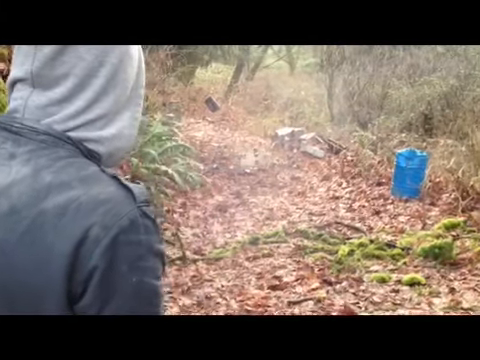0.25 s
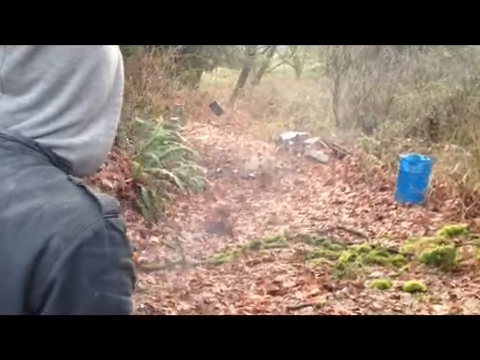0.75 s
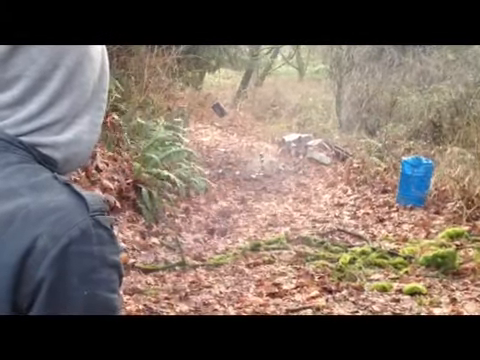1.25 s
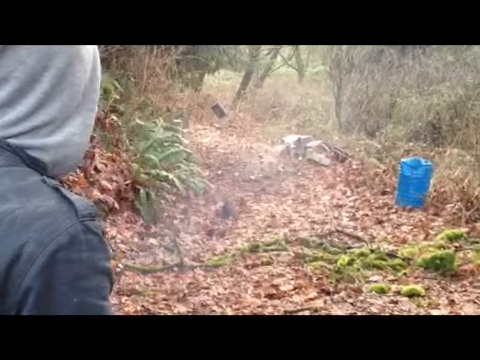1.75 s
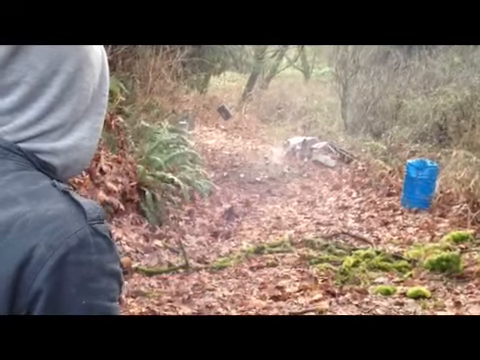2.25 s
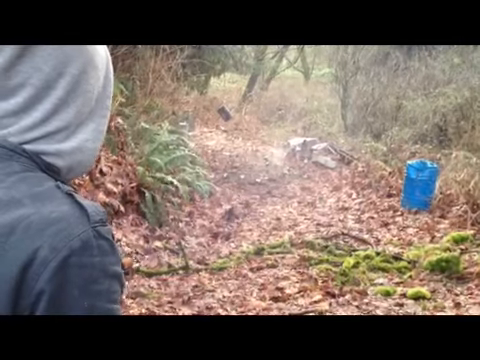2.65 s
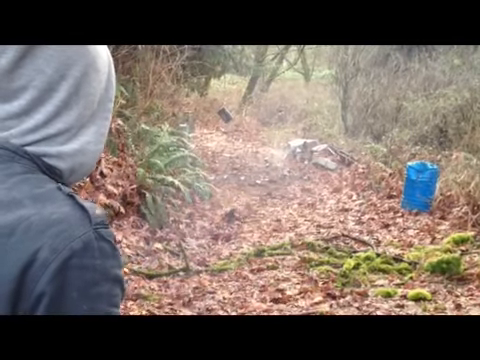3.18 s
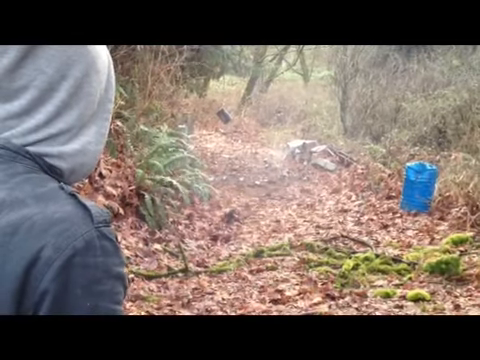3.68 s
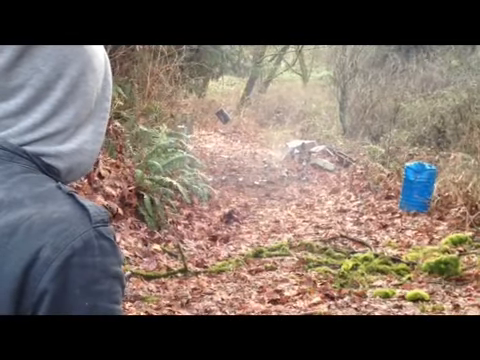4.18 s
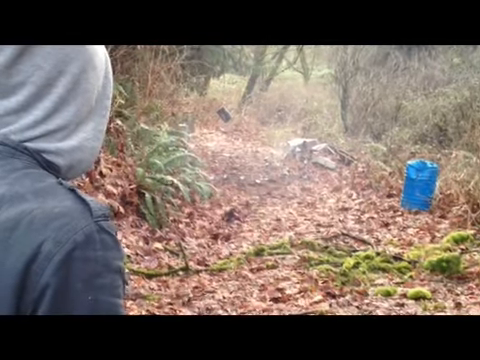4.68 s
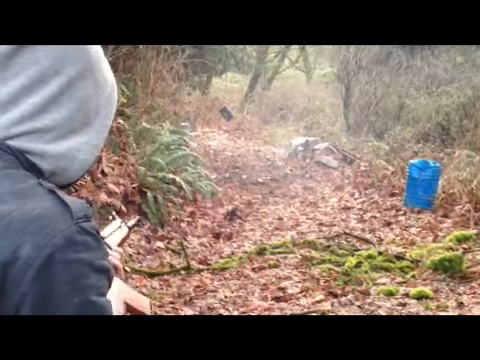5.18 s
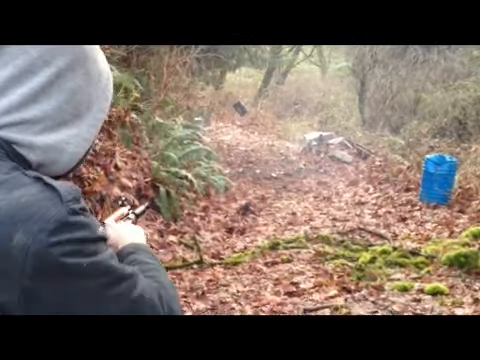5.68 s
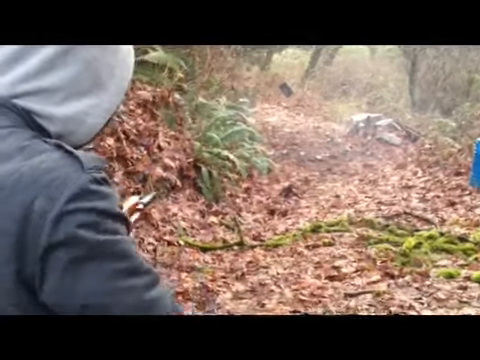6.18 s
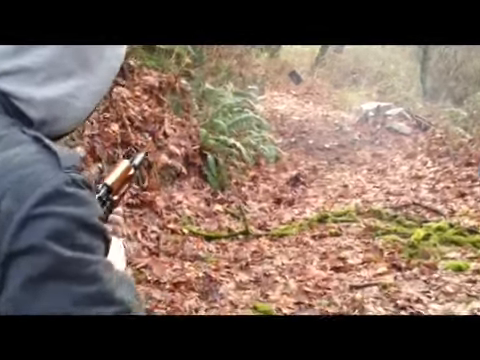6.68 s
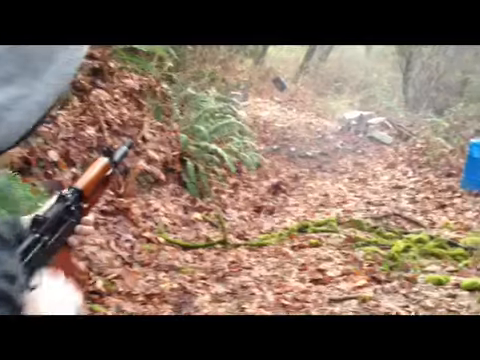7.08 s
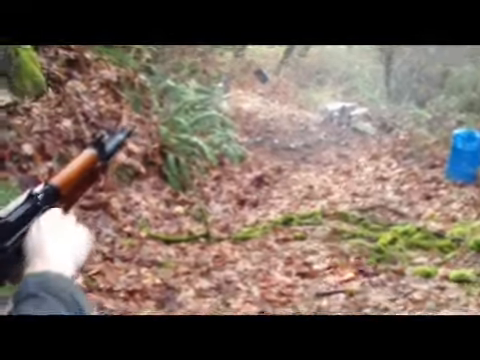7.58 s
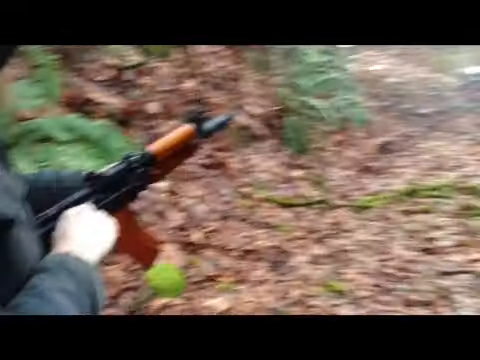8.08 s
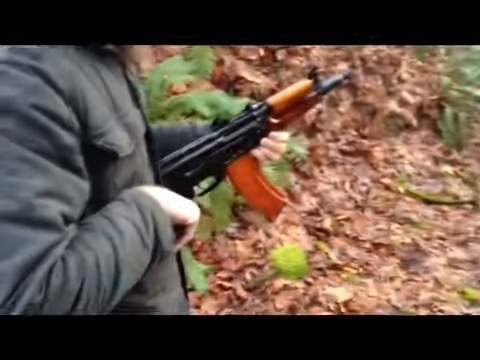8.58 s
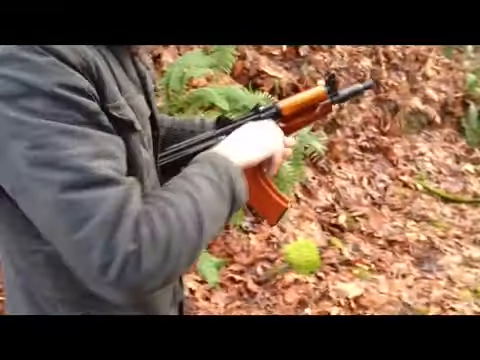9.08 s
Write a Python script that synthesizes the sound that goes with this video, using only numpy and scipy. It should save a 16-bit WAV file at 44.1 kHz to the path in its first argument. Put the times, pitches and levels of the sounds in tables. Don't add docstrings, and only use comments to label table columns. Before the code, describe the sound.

Outdoors among trees, a short rifle beside an overloaded small microphone fires three double shots, each a hard flat crack with a dense echoing wash fading over seconds. Cases tick brightly. After a quieter gap comes close handling: a rattling magazine removal, a loud clunky insertion with a thin high ring, a scraping bolt pull and sharp release. Cloth brushes softly at the end over a faint outdoor hush.

```python
import sys
import numpy as np
from scipy import signal
from scipy.fft import rfft, irfft, next_fast_len
from scipy.io import wavfile
from scipy.ndimage import uniform_filter1d

SR = 44100
rng = np.random.default_rng(int(sys.argv[2]) if len(sys.argv) > 2 else 0)


def amp(db):
    return 10 ** (np.asarray(db, float) / 20)


def write(x):
    x = np.atleast_2d(x).T
    wavfile.write(sys.argv[1], SR, np.round(np.clip(x, -1, 1) * 32767).astype(np.int16))


N = 411894
TIME = np.arange(N) / SR


# start in seconds, blast level in dB.
SHOTS = [
    (-.521, 4.5),
    (-.407, -2.5),
    (.6216, 1),
    (.7305, -1),
    (1.4986, 0.5),
    (1.6128, -0.5),
    (2.7722, 1),
    (2.9203, 1),
]
# frequency in Hz, level in dB per Hz.
CRACK = [(100, -31), (400, -13), (1200, -1.5), (3000, -4), (6500, -1.5), (10000, -10.5), (15000, 1.5)]


def gunfire(same, other):
    out, t = np.zeros(N), TIME[:SR // 2]
    blast_fade = amp(1.5) * np.exp(-t / 0.0071) + amp(-0.5) / (1 + (t / 0.042) ** 5.0)
    linger_fade = amp(-12) * np.exp(-t / 0.24) * (1 - 2 * t) ** 2
    onset = np.minimum(t / 0.0006, 1)
    low_pass = signal.butter(4, 12800, fs=SR, output="sos")
    for k, (s, db) in enumerate(SHOTS):
        drift = other * np.cos(2.4 * k)
        add(out, s, amp(db) * (same + 0.5 * drift))
        crack = unit(colour(rng.standard_normal(len(t)), CRACK))
        dull = signal.sosfilt(low_pass, crack)
        linger = dull + np.exp(-t / 0.08) * (crack - dull)
        add(out, s, (blast_fade * crack + linger_fade * linger) * onset)
    return out


# frequency in Hz, starting level in dB per Hz,
# loss to air and leaves in dB per second.
BLAST = [(40, -44, 6.5), (88, -38.5, 5.5), (208.5, -0.5, -4), (350, 1, -3.5), (727, 1.5, 5),
         (1110, -4, 3.5), (2200, -6, 15), (2700, -6, 22.5), (3480, -7, 21.5), (5640, -5.5, 48),
         (9000, -6, 76), (14000, -25, 104.5)]
# delay after a shot in seconds, level over the wash in dB.
ECHOES = [(.032, 10), (.051, 14.5), (.099, 12), (.112, 6.5), (.135, 4.5), (.34, 8), (.474, 4.5), (0.622, 5),
          (1.039, 2.5), (1.185, 8.5), (1.21, 7.5), (1.355, 9), (1.661, 5), (4.129, 8)]
# delay after a shot in seconds, level over the wash in dB.
SLAPS = [(.17, 3), (.2055, 9.5), (.223, 8), (.246, 9.5), (0.2817, 10.5), (.335, 8), (.353, 8.5), (.385, 8),
         (.4185, 12), (.53, 6), (1.66, 11), (1.776, 12), (1.806, 15), (1.97, 7.5), (2.12, 8), (2.17, 9),
         (2.345, 9), (2.496, 14), (2.735, 16.5)]


def woods():
    t = np.arange(int(4.3 * SR)) / SR
    size = next_fast_len(len(t))
    octave = np.log2(np.maximum(np.fft.rfftfreq(size, 1 / SR), 1))
    spectrum = rfft(grit(len(t), rough_db=1.8), size)
    echo_spread_s = 0.0065
    echoes = sum((amp(db) - 1) * np.exp(-((t - s) / echo_spread_s) ** 2) for s, db in ECHOES)
    path = t / (1 + t / 1.78)
    flutter_db = 2.4 * np.minimum(t / 1.5, 1) * walk(len(t), 60)
    out = 0
    for centre in np.arange(5, 14.5, 0.5):
        hz = 2 ** centre
        half_octave = np.clip(1 - 2 * abs(octave - centre), 0, 1)
        part = irfft(spectrum * half_octave, size)[:len(t)]
        clumps_db = 2.0 * walk(len(t), 40)
        db = along(BLAST, hz) - along(BLAST, hz, axis=2) * path + flutter_db + clumps_db
        out = out + part * amp(db) * (1 + echoes / (1 + (hz / 1500) ** 2))
    for s, db in SLAPS:
        slap_hz = 535 + 60 * s
        swing = 2 * np.pi * slap_hz * t[:400]
        add(out, s, amp(db - 11) * np.sin(swing) * swing * np.exp(-swing / 3.5))
    return above(out * wash(t) * amp(15.5), 89)


# delay after a shot in seconds, level in dB, spread in seconds.
SLOPES = [(1.22, -42.5, .17), (2.1, -45, .3), (2.65, -52.5, .2), (3.35, -53.5, .45), (4.12, -57, .11)]


def wash(t):
    close = amp(-15 - 61 * t)
    wood = amp(-17 - 21 * t)
    power = close ** 2 + wood ** 2
    power += sum(amp(db) ** 2 * np.exp(-((t - s) / spread) ** 2) for s, db, spread in SLOPES)
    fill_db = -6 * np.exp(-t / 0.011)
    return np.sqrt(power) * amp(fill_db)


def steel():
    out = np.zeros(N)
    blows(out)
    knocks(out)
    rings(out)
    thumps(out)
    slides(out)
    return out


# start in seconds, peak level in dB,
# struck part in Hz, treble in dB.
MAGAZINE = [(6.0821, -26, 2380, -6), (6.1472, -23, 1600, -7), (6.1708, -8.5, 2540, -13.5),
            (6.1762, -12, 2140, -11), (6.2284, -22, 2280, -7), (7.1114, -19.5, 2567, -13),
            (7.1182, -13, 3370, -8), (7.1316, -3, 1566, -9), (7.1377, 1.5, 1644, -3.5),
            (6.2213, -28, 2900, 5), (7.1455, -9, 2750, -2), (7.1509, -4.5, 3460, 2),
            (7.1586, -4.5, 2976, 0), (7.1629, -3.5, 2800, 7.5)]
PULL = [(7.5783, -41, 2570, -32), (7.6592, -37, 3350, -17), (7.6642, -31.5, 2600, -35),
        (7.815, -31.5, 3060, -30), (7.8474, -28, 3050, 4), (7.8585, -10, 3000, -6),
        (7.8674, -15, 1820, -2.5), (7.895, -15.5, 1680, -6), (7.9004, -22, 2260, -8.5),
        (7.914, -21, 1520, -4), (7.928, -20, 2800, -19), (7.9467, -17, 3620, 3), (7.9505, -18, 1750, -5),
        (7.9584, -20.5, 2950, -7)]
RELEASE = [(8.2781, -25, 1410, -18), (8.2875, -9, 3595, -21.5), (8.3025, -7, 1688, -0.5),
           (8.306, -7, 3603, 3.5), (8.3159, -3, 2580, -14), (8.3284, -12.5, 2602, 13.5),
           (8.3342, -4.5, 3240, -13.5), (8.3412, -13.5, 2855, -18), (9.3273, -26.5, 2500, -20)]
BLOW_T60_S = [0.025, 0.039, 0.042]
STOCK_DB = [-20.5, -20.5, -20]


def blows(out):
    t = TIME[:SR // 8]
    for action, t60, stock_db in zip((MAGAZINE, PULL, RELEASE), BLOW_T60_S, STOCK_DB):
        for s, db, hz, treble_db in action:
            push = grit(len(t), rough_db=1.5) * np.exp(-np.log(1000) * t / max(t60, 0.004))
            push[:1] += amp(8.5)
            part = amp(5.5) * band(band(push, hz, 520), hz, 520)
            stock = amp(stock_db + 22.5) * wood_body(push)
            add(out, s, amp(db + 2.5) * (part + stock + receiver(push, treble_db, scatter_db=4)))


# start in seconds, level in dB.
KNOCKS = [
    (6.0821, -44),
    (6.2284, -34.5),
    (7.1376, -20),
    (7.1624, -18),
    (7.6595, -40),
    (7.8155, -44.5),
    (7.9146, -31),
    (8.2781, -37),
    (8.306, -22),
]


def knocks(out):
    for s, db in KNOCKS:
        add(out, s, amp(db + 36.5) * wood_body(np.exp(-TIME[:SR // 8] / 0.000099)))


# start in seconds, frequency in Hz, level in dB,
# fall by 60 dB in seconds.
RINGS = [
    (7.164, 1520, -51, 0.74),
    (7.164, 3296, -62, 3.5),
    (7.164, 11840, -53, 0.21),
    (7.164, 12740, -36, 0.39),
    (7.164, 13650, -31, .2),
    (8.335, 3310, -65.5, 4.),
    (8.335, 12700, -48, 0.25),
    (8.335, 6150, -56.5, 0.35),
]


def rings(out):
    t = TIME[:2 * SR]
    for s, hz, db, t60 in RINGS:
        add(out, s, amp(db - 60 * t / t60) * np.sin(2 * np.pi * hz * t))


THUMP_S = [
    7.165,
    7.166,
    7.66,
    8.336,
]
# level in dB, frequency in Hz.
THUMPS = [
    (-5.5, 330),
    (-18, 150),
    (-34, 370),
    (-28.5, 280),
]


def thumps(out):
    t = TIME[:SR // 8]
    for s, (db, hz) in zip(THUMP_S, THUMPS):
        swing = np.sin(2 * np.pi * hz * t / (1 + t / 0.023))
        fade = np.exp(-t * hz / 1.7) * np.minimum(t / 0.00056, 1)
        add(out, s, above(amp(db) * fade * swing, 60))


# start in seconds, stop in seconds, quiet again at seconds,
# level at the stop in dB, treble in dB.
SLIDES = [
    (6.079, 6.142, 6.156, -44.5, -8.5),
    (6.146, 6.225, 6.32, -35.5, -8),
    (7.108, 7.179, 7.2, -27, -3.5),
    (7.846, 7.959, 8.0, -34.5, -7),
    (8.28, 8.343, 8.375, -28, 0.5),
]


def slides(out):
    attack_s, swell_db_s, drop_db = 0.004, 76, 33.5
    for start, stop, end, db, treble_db in SLIDES:
        span = np.arange(start, end, 1 / SR)
        first_db = db - swell_db_s * (stop - start)
        speed_db = np.interp(span, [start, start + attack_s, stop, end],
                             [first_db - 19.5, first_db, db, db - drop_db])
        rub = grit(len(span), rough_db=1.8)
        lumps_db = 2.4 * walk(len(span), 300)
        stock = amp(10.5) * band(band(rub, 910, 190), 910, 190)
        body = receiver(rub, treble_db, scatter_db=3) + stock + amp(4.5) * band(rub, 2100, 1100)
        add(out, start, 3.74 * body * amp(speed_db + lumps_db))


# frequency in Hz, width in Hz, level in dB.
RECEIVER = [(1520, 180, -1), (2800, 740, -5), (3470, 570, -5.5), (4300, 800, -3.5), (5760, 1100, 3),
            (6580, 1200, -1.5), (8330, 1300, 3.5), (11800, 2000, -2.5)]


def receiver(push, treble_db, scatter_db):
    share = scatter_db * rng.standard_normal(len(RECEIVER))
    parts = []
    for (hz, width, db), change_db in zip(RECEIVER, share):
        parts.append(amp(db + change_db) * band(band(push, hz, 1.7 * width), hz, 1.7 * width))
    broad = amp(-2.5) * above(band(push, 3900, 2700), 1100)
    treble = sum(parts[3:]) + amp(-6.5) * above(push, 3600)
    return sum(parts[:3]) + broad + amp(treble_db) * treble


def wood_body(push):
    return band(band(push, 870, 270), 870, 270)


# frequency in Hz, level in dB per Hz.
NEAR = [(300, -29.5), (1200, 0), (2500, 0.5), (6000, 0), (10000, -5.5), (15000, -15)]


def near_trees(metal):
    t = TIME[:SR // 2]
    fade = np.exp(-t / 0.014) + amp(-12.5) * np.exp(-t / 0.097)
    power = signal.fftconvolve(metal ** 2, fade ** 2)[:N]
    return amp(-52.5) * np.sqrt(np.maximum(power, 0)) * unit(colour(rng.standard_normal(N), NEAR))


# start
# in seconds, peak level in dB, centre frequency in Hz, length in seconds.
CASES = [(0.185, -34.5, 13000, 0.0026), (.235, -47, 11000, .006), (.321, -40, 11500, 0.0051),
         (0.34, -44, 13000, .006), (0.563, -55, 11200, 0.036), (1.063, -29, 9000, 0.014),
         (1.934, -23, 9000, 0.0075), (2.17, -48, 12000, 0.0069), (2.618, -42.5, 10860, 0.0051),
         (2.65, -54, 11000, .005), (3.711, -44, 11450, 0.0043), (4.068, -58, 6940, 0.0088),
         (4.921, -46, 3720, 0.011), (9.3272, -35, 5600, .006)]
# start in seconds, level in dB.
JOLTS = [
    (.185, -48),
    (.321, -55),
    (2.618, -66.5),
]


def cases():
    out, t = np.zeros(N), TIME[:SR // 10]
    for s, db, hz, length in CASES:
        tick = unit(band(rng.standard_normal(len(t)), hz, 0.95 * hz))
        add(out, s, amp(db) * np.exp(-t / length) * tick)
    for s, db in JOLTS:
        add(out, s, amp(db) * np.exp(-t / 0.018) * np.sin(2 * np.pi * 32 * t))
    return out


# peak in seconds, level in dB, rise by 20 dB in seconds, fall by 20 dB in seconds.
SLEEVE = [
    (6.682, -62, .12, .045),
    (8.85, -64, .09, .05),
    (9.12, -54.5, .17, .085),
]


def sleeve():
    cloth = colour(grit(N, rough_db=1.5),
                   [(800, -5), (1900, -5), (2700, 3.0), (3600, -14), (6500, 2.0), (9500, -8), (13000, -4.0)])
    strokes = 0
    for s, db, rise, fall in SLEEVE:
        away = (TIME - s) / np.where(TIME < s, -rise, fall)
        strokes = strokes + amp(db + 3.5 - 20 * away ** 3)
    return unit(cloth) * strokes


# frequency in Hz, level in dB per Hz.
HUSH = [(40, -45.5), (100, -14), (224, -4.5), (840, -12), (1500, -18), (3300, -17), (4300, -28.5),
        (6000, -24), (9500, -38.5), (15000, -37)]
# frequency in Hz, level in dB per Hz.
HISS = [(3000, -12), (6000, 4), (9500, -10), (12500, -1.5), (15000, -1)]
# start in seconds, drop in dB, held in seconds, back in seconds.
HUSH_DUCKS = [
    (0, 12, 4.5, 1.5),
    (7.15, 6, .05, .5),
    (8.3, 7, 0.13, 0.97),
]
HISS_DUCKS = [
    (0, 17, 3.4, .8),
    (7.15, 25, .3, 2.5),
]


def hush():
    air = unit(colour(rng.standard_normal(N), HUSH)) * ducked(-58, HUSH_DUCKS) * amp(1.2 * walk(N, 8.3))
    return air + unit(colour(rng.standard_normal(N), HISS)) * ducked(-69.5, HISS_DUCKS)


def ducked(db, ducks):
    for s, drop, held, back in ducks:
        db = db - drop * (TIME >= s) * np.clip(1 - (TIME - s - held) / back, 0, 1)
    return amp(db)


def along(table, hz, axis=1):
    table = np.array(table)
    return np.interp(np.log(np.maximum(hz, 1)), np.log(table[:, 0]), table[:, axis])


def colour(x, table):
    size = next_fast_len(len(x))
    gain = amp(along(table, np.fft.rfftfreq(size, 1 / SR)))
    return irfft(rfft(x, size) * gain, size)[:len(x)]


def unit(x):
    return x / np.sqrt(np.mean(x ** 2))


def band(x, hz, width):
    return signal.lfilter(*signal.iirpeak(hz, hz / width, SR), x)


def above(x, hz):
    return signal.sosfilt(signal.butter(4, hz, "high", fs=SR, output="sos"), x)


def add(out, s, piece):
    i = int(round(s * SR))
    a, b = max(i, 0), min(i + len(piece), len(out))
    out[a:max(a, b)] += piece[a - i:b - i]


def grit(size, rough_db):
    return unit(rng.standard_normal(size) * amp(rough_db * rng.exponential(size=size)))


def walk(size, rate):
    k = int(SR / rate)
    held = np.repeat(rng.standard_normal(size // k + 1), k)
    return 1.2 * uniform_filter1d(held, k)[:size]


# frequency in Hz, level in dB.
MIC = [(60, -14.5), (150, -3.5), (700, -0.5), (950, -3.5), (1300, 0), (3500, 3), (4200, -4.5), (5600, 2),
       (7500, -1.5), (9800, -8.5), (12500, -3.5), (15000, -9)]


def scene():
    shots, metal = gunfire(woods(), woods()), steel()
    heard = shots + cases() + metal + near_trees(metal) + sleeve()
    return (colour(heard, MIC) + hush())[None]


def top_cut(x):
    return signal.sosfilt(signal.butter(12, 15970, fs=SR, output="sos"), x)


def record(dry):
    hot = np.tanh((1.01 * abs(dry)) ** 1.593) ** (1 / 1.595) * np.sign(dry)
    hot = signal.lfilter([1, -1], [1, -np.exp(-2 * np.pi * 70 / SR)], hot)
    cut = signal.sosfilt(signal.ellip(8, 0.2, 50, 15250, fs=SR, output="sos"), hot)
    return top_cut(np.clip(0.71 * cut, -1, 1))


dry = scene()
out = record(dry)
write(out)
```